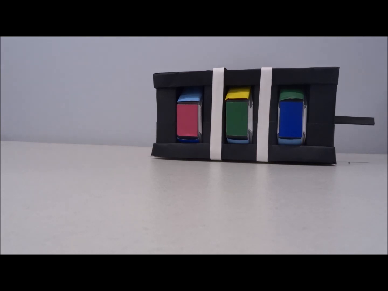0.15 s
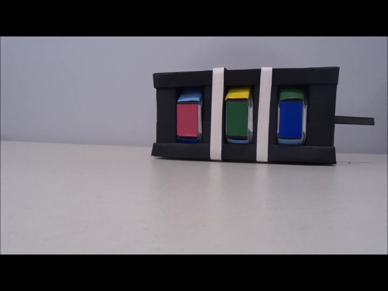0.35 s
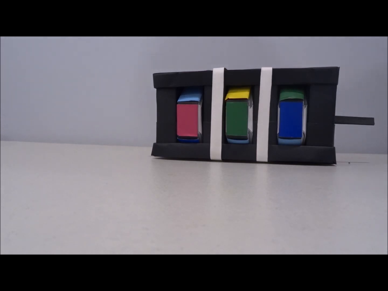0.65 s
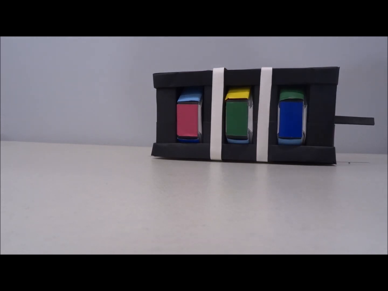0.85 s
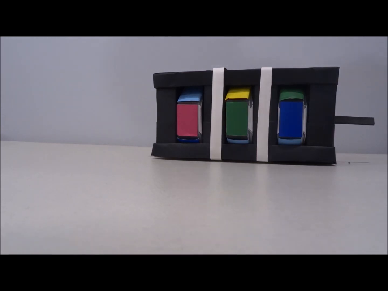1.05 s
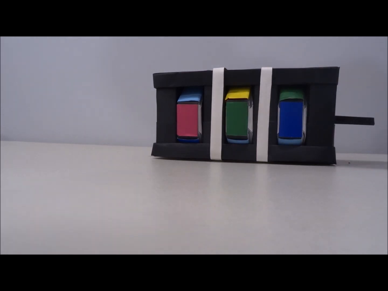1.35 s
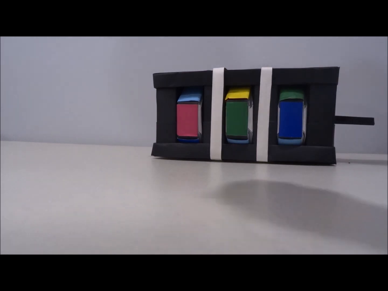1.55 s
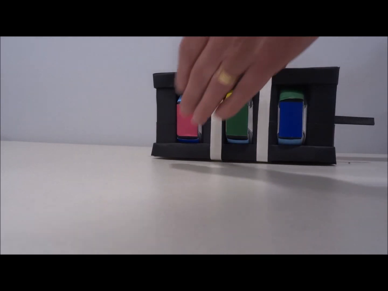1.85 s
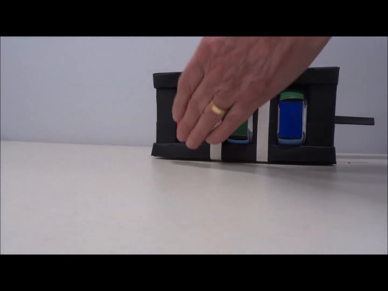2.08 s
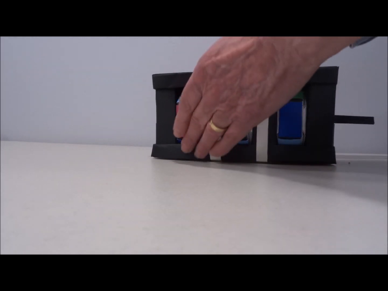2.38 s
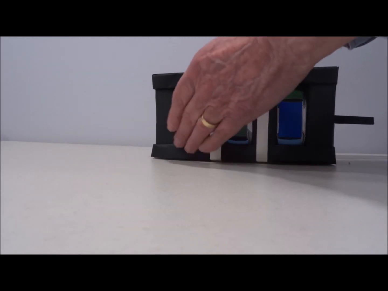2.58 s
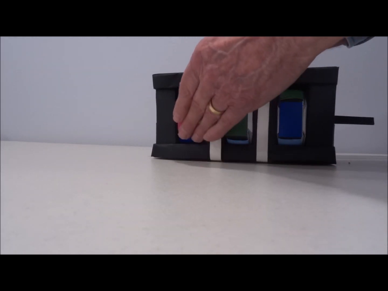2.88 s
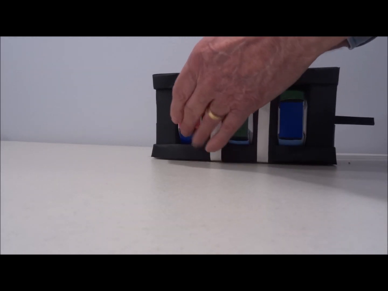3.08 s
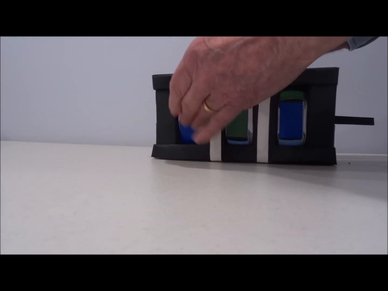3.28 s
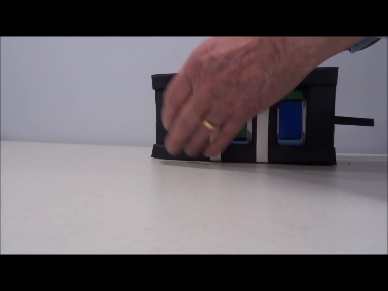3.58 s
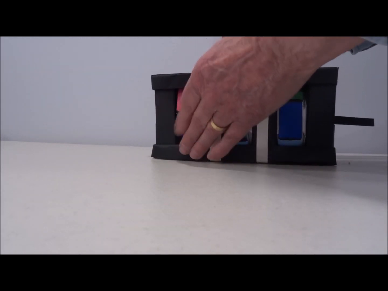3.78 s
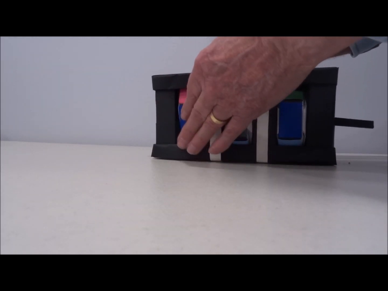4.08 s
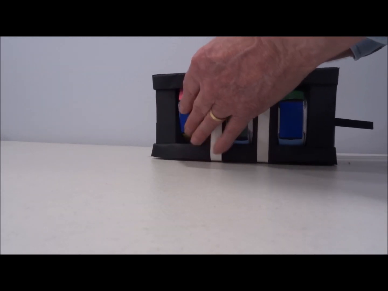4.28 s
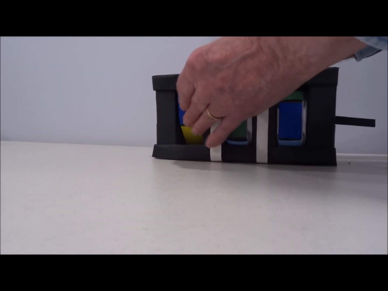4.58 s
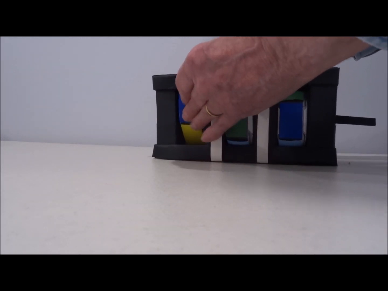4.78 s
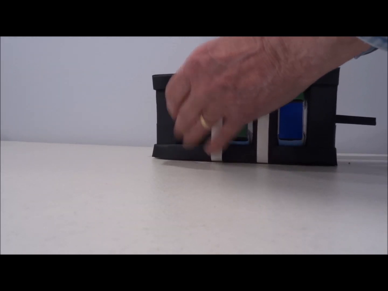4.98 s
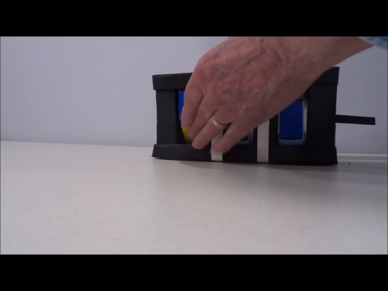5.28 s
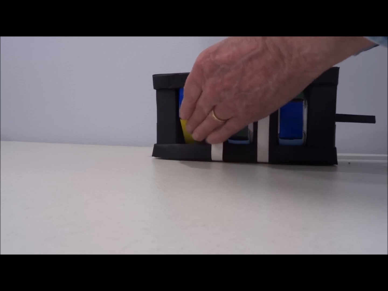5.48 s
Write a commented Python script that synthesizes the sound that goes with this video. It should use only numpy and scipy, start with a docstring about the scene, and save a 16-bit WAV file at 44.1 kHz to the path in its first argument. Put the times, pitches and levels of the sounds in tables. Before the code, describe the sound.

An arm judders briefly over a table and a sleeve swishes in. A hand bumps a hollow paper lock box and the fingers slide down it. Then its cardstock wheels turn in short, dry rubbing strokes, their folded edges ticking. From about halfway on, the box also rocks and knocks on the table several times. The sounds are near the centre, in a small, quiet room.

```python
"""A hand turns the cardstock wheels of a folded paper lock on a table in a small, quiet room.
First an arm judders over the table, sticking and slipping. A sleeve swishes in, the hand bumps the
hollow box, and the fingers slide down it and take hold. Then the wheels rub, card on card, in short
strokes, and their folded edges tick as they snap past the frame. From about halfway on, the box
also rocks and knocks on the table several times."""
import sys
import numpy as np
from scipy import signal
from scipy.fft import rfft, irfft
from scipy.io import wavfile

SR = 44100
rng = np.random.default_rng(int(sys.argv[2]) if len(sys.argv) > 2 else 0)


def dump_mix(stems):
    """Bounce the given channels to the path in sys.argv[1] as a 16-bit WAV at rate SR."""
    frames = np.atleast_2d(stems).T  # one column per channel
    limited = np.clip(frames, -1, 1)  # hard clip at full scale
    pcm = np.round(limited * 32767).astype(np.int16)
    wavfile.write(sys.argv[1], SR, pcm)


N = 248724
TIME = np.arange(N) / SR

# tone of the steady room noise: (frequency [Hz], level [dB])
AIR_TONE = [(15, -24), (25, -12.5), (207, 3), (303, -3.5), (422, -4), (721, -12.5), (1260, -14.5),
            (1590, -20), (2050, -17.5), (2710, -26), (3320, -22.5), (4630, -28), (5120, -26.5),
            (8100, -29.5), (11000, -32), (14300, -117), (22000, -120)]
# tone of the table's rumble: (frequency [Hz], level [dB])
RUMBLE_TONE = [(20, -7), (50, 12), (90, 13), (150, 15.5), (300, -23)]
# the arm dragging on the table: (start [s], length [s], judder [dB], scuff [dB])
ARM_DRAGS = [(0.0, 0.018, -50, -66), (0.172, 0.042, -45.5, -82), (0.247, 0.04, -39.5, -64),
             (0.409, 0.075, -38, -64)]
# tone of the arm's judder: (frequency [Hz], level [dB])
ARM_TONE = [(60, -39), (120, -10), (190, -1), (300, -5.5), (400, -1.5), (590, 3), (750, 0.5), (1000, 1),
            (1400, -7), (1750, -18.5), (2150, -13.5), (3000, -25), (9000, -55)]
# the sleeve brushing: (peak time [s], rise [s], fall [s], swish [dB], hiss [dB])
SLEEVE_MOVES = [(1.11, 0.091, .13, -62.5, -62.5), (1.72, 0.45, 0.35, -59.5, -56.5),
                (1.803, 0.014, 0.051, -44, -50.5), (1.869, 0.014, 0.048, -42, -49),
                (1.97, 0.083, 0.11, -44.5, -53)]
# tone of the cloth: (frequency [Hz], level [dB])
CLOTH_TONE = [(410, -49), (700, 11), (912, 7), (1200, 7.5), (1300, 6.5), (1450, 10), (1890, 10.5),
              (4180, 0.5), (11000, -2), (14300, -42), (22000, -120)]
# knocks of the box; the last three columns are added to the level:
# (time [s], level [dB], treble limit [Hz], thump pitch [Hz], thump [dB], crack [dB], rattle [dB])
BOX_KNOCKS = [(1.784, -37, 300, 40, 9.5, -30, -30), (1.795, -33, 350, 171, -0.5, -26, -26),
              (3.3158, -25.5, 4050, 229, -7, -28, -19), (3.3178, -9.5, 1680, 230.4, -14, -17, -25),
              (3.956, -42, 400, 238, 2, -30, -30), (4.0698, -22, 3000, 227, -4, -27, -18),
              (4.0767, -16.5, 2670, 337, -12, -10.5, -27), (4.0796, -11.5, 2060, 234, -10.5, -17, -41),
              (4.2535, -32.5, 1800, 229, -26, -18, -22), (4.3376, -23.5, 7050, 81, -2, 13.5, -1.5),
              (4.3401, -10.5, 1770, 193, -21.5, 0, -4), (5.0368, -30, 1860, 330, -8, -13, -26.5),
              (5.0404, -23.5, 1200, 161, 2.5, -5.5, -21), (5.0449, -23.5, 1220, 173, -8, -24, -24),
              (5.6155, -30, 2500, 233, -13, -12, -14)]
# notes the hollow box rings at: (pitch [Hz], level [dB], time to fade by 60 dB [s])
BOX_NOTES = [(479, -16, 0.11), (563.6, -5, 0.065), (623, -10.5, 0.031), (743, -4.5, 0.017),
             (970, -7.5, 0.01), (1147, -4, 0.0099), (1650, -6.5, 0.012), (1950, -21.5, 0.074),
             (2404, -11, 0.016), (3265, -9.5, 0.024)]
# notes the table top rings at: (pitch [Hz], level [dB], time to fade by 60 dB [s])
TABLE_NOTES = [(56.6, -25, 0.83), (84.4, -25, 0.43), (162.7, -26.5, 0.28), (249.2, -15, .13),
               (313, -22.5, 0.41), (408, -16, 0.26)]
# fingers sliding down the box: (peak time [s], rise [s], fall [s], level [dB])
FINGER_SLIDES = [(2.04, .1, 0.063, -37.5), (2.261, 0.13, 0.23, -52.5)]
# tone of the sliding fingers: (frequency [Hz], level [dB])
FINGER_TONE = [(100, -43), (200, 2.5), (270, -4), (310, 11.5), (370, -6), (480, -2.5), (600, 1.5),
               (790, -9.5), (1050, -7.5), (1500, -14), (3000, -29), (8000, -55)]
# the box skidding under the fingers: (start [s], length [s], level [dB])
BOX_SKIDS = [(2.397, 0.053, -35)]
# tone of the skid: (frequency [Hz], level [dB])
SKID_TONE = [(59, -58), (100, -21), (202, -10.5), (321, -5), (584, 1), (693, -10.5), (851, -11),
             (1280, -13), (2000, -23), (2920, -35), (4190, -47), (6000, -38), (7800, -71), (13200, -120)]
# pushes on the wheels; the last two columns are added to the rub:
# (peak time [s], rise [s], fall [s], rub [dB], hollow [dB], hiss [dB])
WHEEL_STROKES = [(2.31, 0.0055, 0.022, -57.5, -17, 1), (2.503, .02, 0.037, -62.5, -1, 5.5),
                 (2.628, 0.026, 0.065, -60, 6, 1.5), (2.825, 0.025, 0.069, -50, 3, -1.5),
                 (3.025, 0.068, 0.049, -49.5, 5.5, -4), (3.073, 0.02, 0.059, -49.5, 6.5, -1.5),
                 (3.229, 0.05, 0.019, -42, -0.5, -8.5), (3.282, .011, .02, -41.5, -5, -5),
                 (3.305, 0.021, 0.036, -36, -1.5, -8), (3.44, 0.042, 0.019, -54, 3, -7),
                 (3.504, 0.032, 0.039, -48, 2, -6), (3.754, 0.015, 0.03, -58, 5, -6),
                 (3.91, 0.011, 0.034, -58, 6, -12), (3.98, 0.037, 0.054, -60, 8.5, -4.5),
                 (4.07, 0.027, 0.052, -41, 3.5, -9.5), (4.21, 0.055, 0.27, -55.5, 3.5, -1.5),
                 (4.325, 0.022, 0.041, -39.5, 4.5, -2.5), (4.522, 0.034, 0.037, -44.5, 2.5, -7),
                 (4.61, 0.017, 0.051, -47.5, 3.5, -7), (4.705, 0.011, .02, -50, 7, -3),
                 (4.745, 0.026, 0.035, -45, 2, -8.5), (4.855, 0.032, 0.047, -52.5, 8, -5),
                 (4.957, 0.031, 0.014, -47, 4.5, -4), (5.12, 0.022, 0.059, -56.5, 3, 4),
                 (5.265, 0.0089, 0.048, -59.5, 12, -2.5), (5.38, 0.041, 0.035, -51, 9, -0.5),
                 (5.465, 0.089, 0.12, -46.5, 3.5, -2), (5.615, 0.061, 0.044, -47.5, 5.5, -7.5)]
# tone of card rubbing on card: (frequency [Hz], level [dB])
CARD_TONE = [(180, -33), (300, -21), (359, 0.5), (457, 2), (609, 1.5), (752, 6), (1130, -8.5), (1550, 5.5),
             (2630, -6.5), (2880, -5), (4190, -16), (4520, -16), (7000, -33), (9900, -31), (11000, -40),
             (14300, -85), (22000, -120)]
# notes the rubbed card panels ring at: (pitch [Hz], width [Hz], level [dB])
PANEL_NOTES = [(566, 60, 3.5), (724, 31, -15), (1125, 89, 10.5), (2410, 170, 3), (2770, 690, 3)]
# how freely the grip lets the panels ring: (time [s], ringing above the plain rub [dB])
PANEL_FREEDOM = [(2.3, 2), (3.0, 0), (3.3, 0), (4.3, 1), (4.45, 6), (4.9, 2.5), (5.1, -7.5), (5.45, 5.5),
                 (5.64, -3.5)]
# folded edges ticking: (time [s], peak level [dB], pitch [Hz], time to fade by 60 dB [s])
EDGE_TICKS = [(2.305, -46, 2800, 0.02), (2.37, -45, 2920, 0.023), (2.4939, -41.5, 5000, 0.051),
              (2.691, -41.5, 2000, 0.02), (3.0649, -35, 3360, 0.048), (3.2952, -25, 2340, .023),
              (3.4241, -42, 2480, 0.01), (3.4294, -36, 2500, .013), (3.493, -27.5, 4000, 0.0084),
              (3.6492, -34, 4160, 0.016), (3.8045, -35, 2900, 0.041), (3.8967, -43.5, 3060, 0.014),
              (4.141, -35.5, 2620, 0.044), (4.1618, -36.5, 2540, 0.023), (4.2253, -33.5, 3200, 0.014),
              (4.285, -35, 2540, 0.016), (4.596, -36, 2400, 0.012), (4.697, -39, 2760, 0.032),
              (4.7992, -33, 2640, 0.019), (4.9586, -32, 3100, 0.01), (5.1088, -37.5, 4660, 0.041),
              (5.2614, -38, 5260, 0.029), (5.2996, -43.5, 3730, 0.044), (5.3517, -33, 2970, 0.019),
              (5.481, -20, 2750, 0.01)]
# how long the room echoes: (frequency [Hz], time to fade by 60 dB [s])
ECHO_FADE = [(100, 0.52), (550, 0.28), (1200, 0.28), (4000, 0.14), (11000, 0.076)]
# how much sound arrives from the sides: (frequency [Hz], level [dB])
SIDE_TONE = [(60, -38.5), (300, -24.5), (600, -17.5), (1200, -13.5), (4000, -12.5), (10000, -13)]

TREBLE_LIMIT_HZ = 11150
HAND_LANDS_S = 1.7


def from_db(db):
    """Turn decibels into a number to multiply by."""
    return 10 ** (np.asarray(db) / 20)


def rms_one(x):
    """Scale a sound to an average strength (rms) of 1."""
    return x / np.sqrt(np.mean(x ** 2) + 1e-20)


def at_hz(points, hz):
    """Read between a table's rows, with octaves evenly spaced."""
    f, value = np.transpose(points)
    return np.interp(np.log(np.maximum(hz, 1)), np.log(f), value)


def keep(x, hz, kind, order=2):
    """Keep the "low" part of a sound, the "high" part or a "band" between."""
    sections = signal.butter(order, np.clip(hz, 10, .45 * SR), kind, fs=SR, output="sos")
    return signal.sosfilt(sections, x + 1e-18)


def colour(x, tone):
    """Give a sound the tone in a table, so that nothing sounds early (minimum phase)."""
    size = 2 ** 18
    cepstrum = irfft(np.log(from_db(at_hz(tone, np.arange(size // 2 + 1) * SR / size))))
    cepstrum[1:size // 2] *= 2
    cepstrum[size // 2 + 1:] = 0
    return irfft(rfft(x, size) * np.exp(rfft(cepstrum)), size)[:N]


def add(track, s, sound):
    """Mix a sound into a track at s seconds."""
    i = int(s * SR)
    track[i:i + len(sound)] += sound[:N - i]


def together(moves, levels_db):
    """Joint strength of overlapping movements: their powers add."""
    return np.sqrt(sum((from_db(db) * move) ** 2 for move, db in zip(moves, levels_db)))


def background(air_db=-56, settle_s=.1):
    """Steady room noise, and a table rumble that grows as the hand's weight comes on."""
    air = from_db(air_db) * rms_one(colour(rng.standard_normal(N), AIR_TONE))
    rumble_db = np.interp(TIME, [HAND_LANDS_S - settle_s, HAND_LANDS_S], [-68, -59])
    return air + from_db(rumble_db) * rms_one(colour(rng.standard_normal(N), RUMBLE_TONE))


def drag(s, length_s, fade_db_per_s, sag_db_per_s=30):
    """A drag starts at once, sags a little while it lasts and then dies away."""
    age = np.clip(TIME - s, 0, 1)
    return (TIME >= s) * from_db(-sag_db_per_s * age - fade_db_per_s * np.maximum(age - length_s, 0))


def judder(starts, level, tone, slips_per_s, jitter, uneven_db, scuff_db, first_slip_db=-1.5):
    """Stick and slip: a drag jerks free, then slips hundreds of times a second, scuffing in between."""
    slips = np.zeros(N)
    for start, end in zip(starts, [*starts[1:], TIME[-1]]):
        chance = rng.standard_normal((200, 2))
        wait = np.exp(jitter * chance[:, 0]) / slips_per_s
        s = start + .001 + np.cumsum(wait) - wait
        size_db = uneven_db * chance[:, 1]
        size_db[0] = first_slip_db
        slips[(s[s < end] * SR).astype(int)] = from_db(size_db[s < end]) * np.sqrt(SR / slips_per_s)
    sound = colour(slips + from_db(scuff_db) * rng.standard_normal(N), tone)
    return level * sound / np.std(sound[level > level.max() / 10])


def grains(per_s, spread_db):
    """Fibres catch and let go, making tiny random clicks."""
    sizes = from_db(spread_db * np.minimum(rng.exponential(1, N), 4)) * rng.choice([-1, 1], N)
    return rms_one(sizes * (rng.random(N) < per_s / SR))


def arm():
    """The arm judders over the table in short drags, with a dry scuff on top."""
    starts, lengths, db, scuff_db = np.transpose(ARM_DRAGS)
    drags = [drag(s, length_s, fade_db_per_s=192) for s, length_s in zip(starts, lengths)]
    slips = judder(starts, together(drags, db - 1), ARM_TONE,
                   slips_per_s=280, jitter=.3, uneven_db=1.5, scuff_db=-3)
    scuff = rms_one(keep(grains(per_s=9000, spread_db=0), [2300, 4500], "band"))
    return keep(slips, 3200, "low") + together(drags, scuff_db) * scuff


def swell(s, rise_s, fall_s, roundness=1.43):
    """A movement speeds up and slows down: 10 dB below its peak one rise before and one fall after."""
    away = np.maximum((s - TIME) / rise_s, (TIME - s) / fall_s)
    return from_db(-10 * np.minimum(away, 10) ** roundness)


def sleeve():
    """Cloth and skin brush softly as the hand reaches in."""
    moves = [swell(*row[:3]) for row in SLEEVE_MOVES]
    swish_db, hiss_db = np.transpose(SLEEVE_MOVES)[3:]
    cloth = colour(grains(per_s=13000, spread_db=3), CLOTH_TONE)
    swish = together(moves, swish_db - 1) * rms_one(keep(cloth, 4630, "low"))
    hiss = together(moves, hiss_db - 1) * rms_one(keep(cloth, 2380, "high"))
    return swish + hiss


def ringing(notes, t):
    """A struck object rings with several pure notes, each fading at its own speed."""
    return sum(from_db(db - 60 * t / fade_s) * np.sin(2 * np.pi * hz * t) for hz, db, fade_s in notes)


def knocks(thump_fade_s=.059, crack_fade_s=.0073, rattle_fade_s=.23, top_db=-8):
    """Each knock rings the box and thumps the table; a hard edge cracks, and loose flaps rattle on."""
    out, t = np.zeros(N), TIME[:SR // 2]
    chatter = grains(per_s=8000, spread_db=1.5)
    for s, db, treble_hz, thump_hz, thump_db, crack_db, rattle_db in BOX_KNOCKS:
        box = keep(ringing(BOX_NOTES, t), treble_hz, "low")
        box = keep(box, 500, "high", order=4)   # a small box gives off little bass
        table = ringing([(thump_hz, -3, thump_fade_s)] + TABLE_NOTES, t)
        thump = from_db(thump_db) * keep(table, 69, "high")
        snap = rng.standard_normal(len(t))
        crack = rms_one(keep(snap, [2200, 5200], "band") + from_db(top_db) * keep(snap, 8500, "high"))
        crack *= from_db(crack_db - 2.5 - 60 * t / crack_fade_s)
        flaps = np.roll(chatter, -int(s * SR))[:len(t)]
        rattle = rms_one(keep(flaps, [2100, 5000], "band") + from_db(top_db) * keep(flaps, 6800, "high"))
        rattle *= from_db(rattle_db - 13 - 60 * t / rattle_fade_s)
        add(out, s, from_db(db) * (box + thump + crack + rattle))
    return out


def fingers():
    """The fingers stick and slip as they slide down the box."""
    peaks, rises, _, db = np.transpose(FINGER_SLIDES)
    moves = [swell(*row[:3]) for row in FINGER_SLIDES]
    return judder(peaks - rises, together(moves, db), FINGER_TONE,
                  slips_per_s=380, jitter=.45, uneven_db=1.5, scuff_db=2)


def resonance(x, hz, width_hz):
    """Let a sound ring around one pitch; a smaller width rings longer."""
    r = np.exp(-np.pi * width_hz / SR)
    feedback = [1, -2 * r * np.cos(2 * np.pi * hz / SR), r * r]
    return signal.lfilter(np.array([1, 0, -1]) * (1 - r * r) / 2, feedback, x)


def wheels(resting_rub_db=-72, resting_hollow_db=-63, resting_hiss_db=-69):
    """Card slides on card: tiny clicks ring the panels, hollow when pressed and hissy when quick."""
    moves = [swell(*row[:3]) for row in WHEEL_STROKES]
    moves.append(TIME > HAND_LANDS_S)   # resting fingers rub faintly between strokes
    db, hollow_db, hiss_db = np.transpose(WHEEL_STROKES)[3:]
    rub = together(moves, [*(db - 1), resting_rub_db])
    hollow = together(moves, [*(db + hollow_db - 2), resting_hollow_db])
    hiss = together(moves, [*(db + hiss_db - 1), resting_hiss_db])
    plain = rms_one(colour(grains(per_s=6000, spread_db=3), CARD_TONE))
    panels = rms_one(sum(from_db(db) * resonance(plain, hz, width) for hz, width, db in PANEL_NOTES))
    freedom = from_db(np.interp(TIME, *np.transpose(PANEL_FREEDOM)))
    friction = (np.roll(plain, SR // 100) + freedom * panels) / np.hypot(1, freedom)
    return (rub * rms_one(keep(friction, [1650, 5200], "band", order=4))
            + hollow * rms_one(keep(friction, [420, 1350], "band", order=4))
            + hiss * rms_one(keep(plain, 5980, "high", order=4)))


def ticks(splash_db=-17):
    """A fold snaps past the frame: a sharp click and a brief crackle in one stiff flap."""
    out, t = np.zeros(N), TIME[:SR // 20]
    for s, db, hz, fade_s in EDGE_TICKS:
        snap = rng.standard_normal(len(t)) * from_db(-60 * t / fade_s)
        snap[0] += 3   # the sharp click
        flap = resonance(snap, hz, width_hz=1300) + from_db(splash_db) * snap
        tick = keep(keep(flap, 340, "high"), 7500, "low", order=1)
        peak = np.abs(keep(tick, TREBLE_LIMIT_HZ, "low")).max()
        add(out, s + .001, from_db(db) * tick / peak)
    return out


def skid():
    """The box sticks and slips a little as the fingers take hold."""
    starts, lengths, db = np.transpose(BOX_SKIDS)
    drags = [drag(s, length_s, fade_db_per_s=295) for s, length_s in zip(starts, lengths)]
    return judder(starts, together(drags, db), SKID_TONE,
                  slips_per_s=240, jitter=.551, uneven_db=5.5, scuff_db=4.5)


def rubbing():
    """Everything that slides, with fresh random detail on each call."""
    return arm() + fingers() + skid() + wheels() + sleeve()


def room(x, first_echo_s=.0099):
    """The blurred echoes of a small room; the treble dies first."""
    t, tail = TIME[:SR // 2], 0
    for low_hz in 90 * 2 ** np.arange(8):
        octave = keep(rng.standard_normal(len(t)), [low_hz, 2 * low_hz], "band", order=3)
        tail += octave * from_db(-60 * t / at_hz(ECHO_FADE, low_hz * np.sqrt(2)))
    fade_in = np.clip(t / first_echo_s - 1, 0, 1)
    return signal.fftconvolve(x, tail * fade_in / np.sqrt(SR * .02))[:N]


def scene():
    """All sources sit near the middle; sound scattered from the sides gives a slight width."""
    blows, clicks, rubs = knocks(), ticks(), rubbing()
    into_room = from_db(-4) * blows + from_db(-10.5) * clicks + from_db(-7.5) * rubs
    middle = blows + clicks + rubs + room(into_room) + background()
    scattered = colour(from_db(1.5) * room(into_room) + rubbing() + from_db(9) * background(), SIDE_TONE)
    # sound reaches left and right slightly apart, so the gap between them follows the wave's slope
    slope = from_db(-7) * np.gradient(keep(blows + clicks, 10000, "low", order=1))
    off_centre = from_db(-38) * keep(middle, 200, "high", order=1)   # the box is a little to the right
    side = scattered - slope - off_centre
    return (middle + side * [[1], [-1]]) * from_db([[-.2], [.2]])


def record(dry):
    """Cut off the highest treble steeply."""
    return signal.sosfilt(signal.ellip(12, .1, 80, TREBLE_LIMIT_HZ, fs=SR, output="sos"), dry)


dry = scene()
out = record(dry)
dump_mix(out)
```